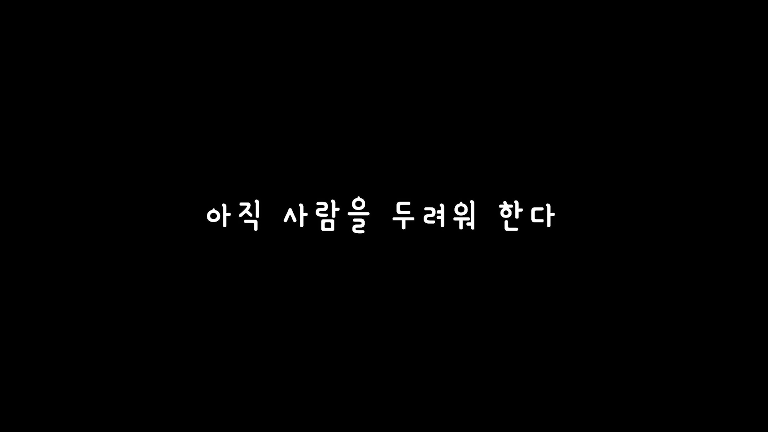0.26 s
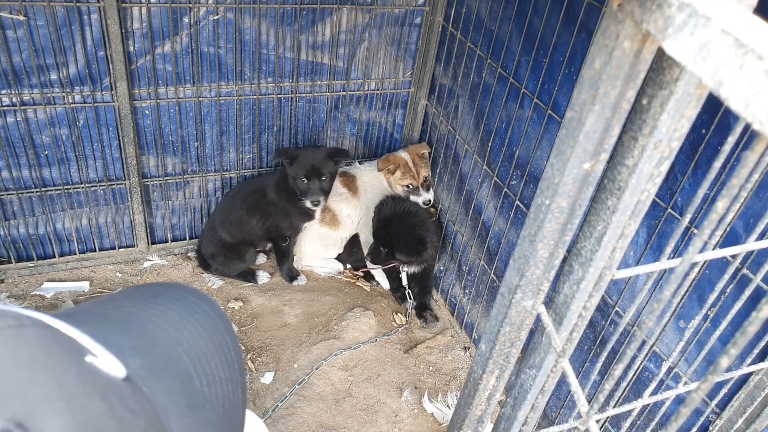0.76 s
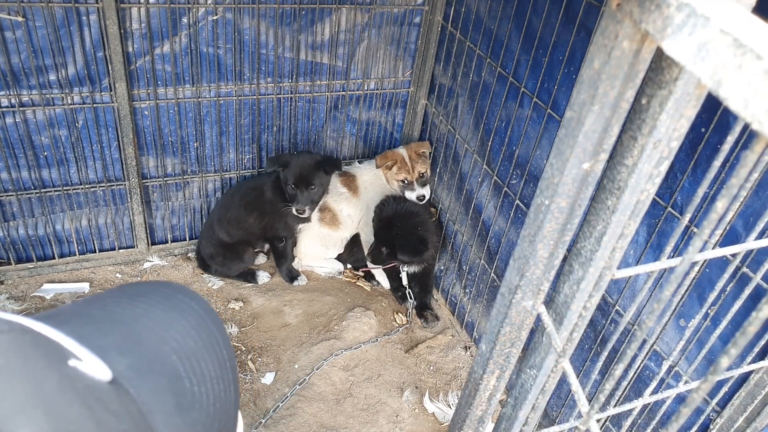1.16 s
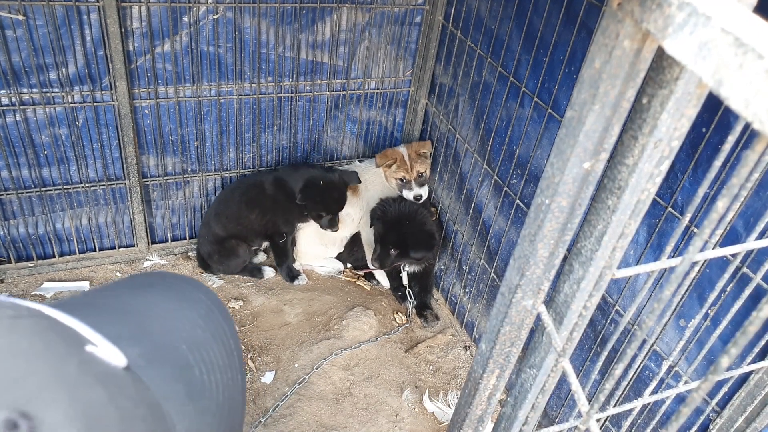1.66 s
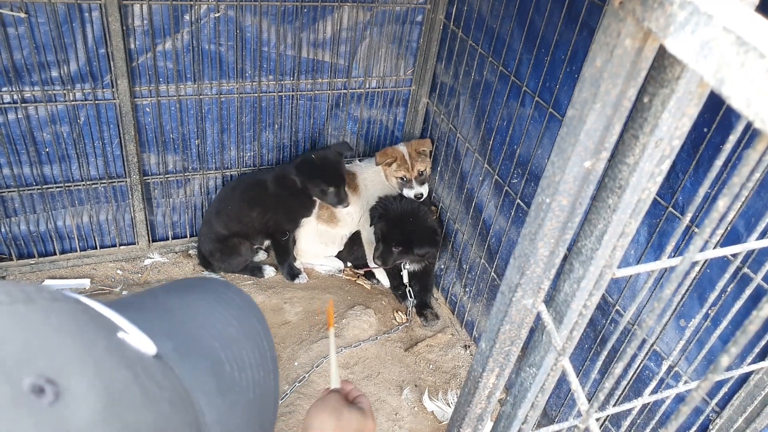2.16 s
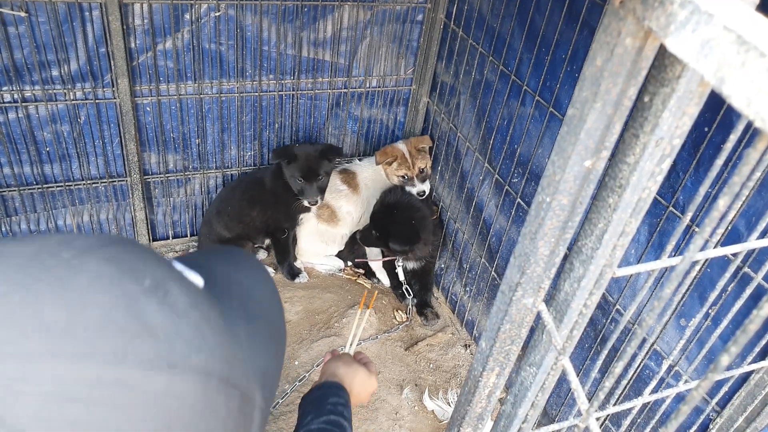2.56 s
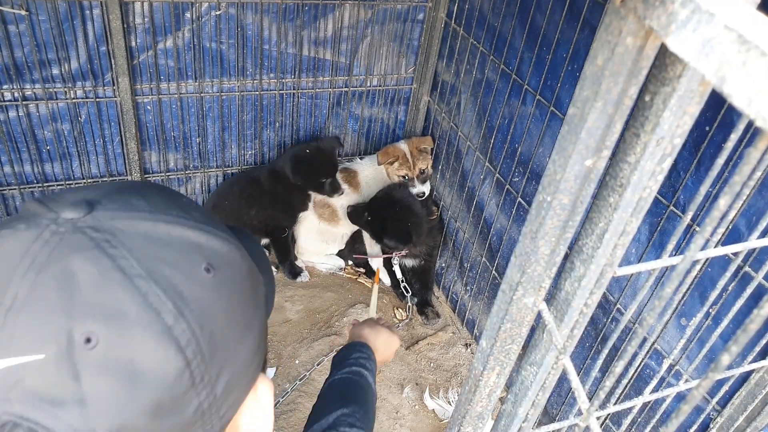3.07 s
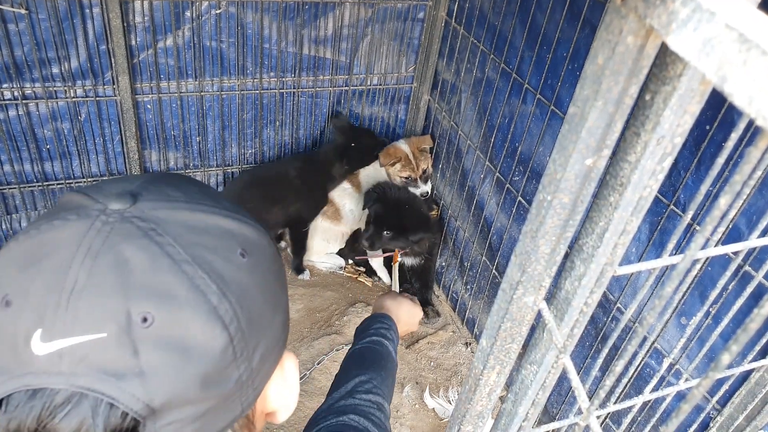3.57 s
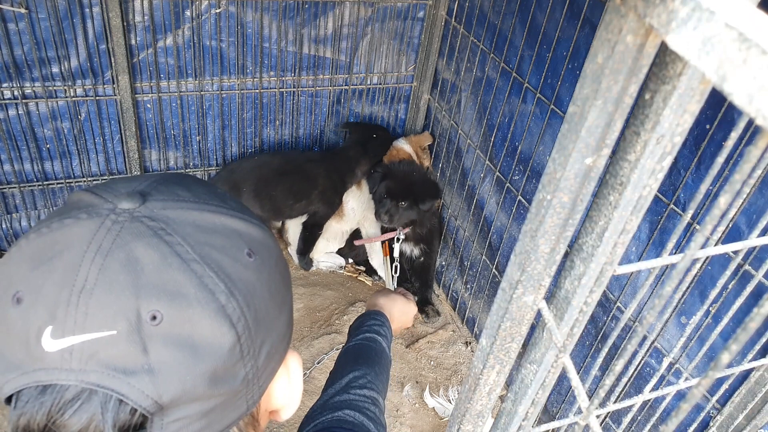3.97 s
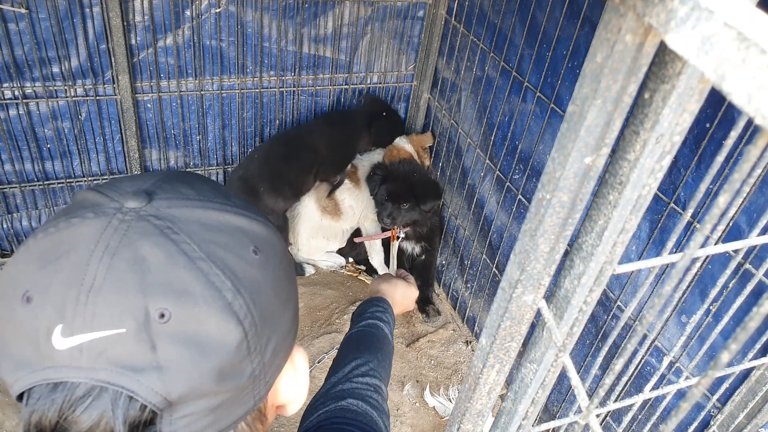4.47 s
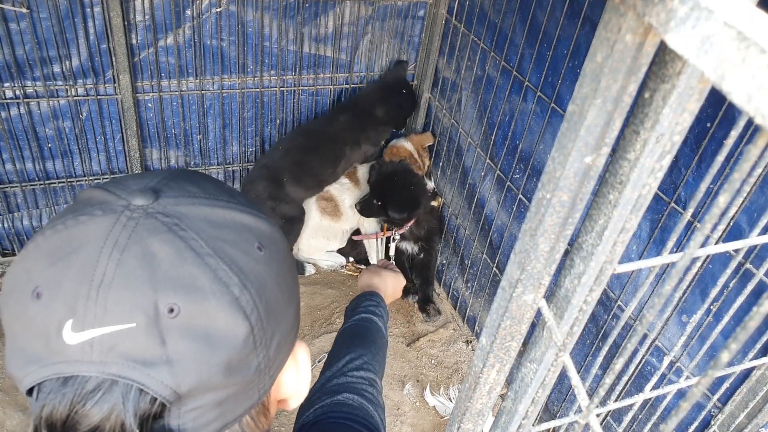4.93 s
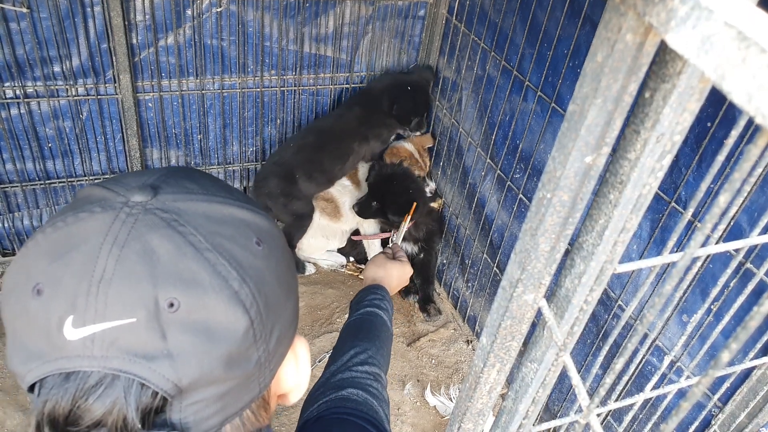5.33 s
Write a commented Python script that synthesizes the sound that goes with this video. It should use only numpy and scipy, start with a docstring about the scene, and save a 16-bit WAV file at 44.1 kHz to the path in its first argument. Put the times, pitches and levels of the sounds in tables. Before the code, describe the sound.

After a moment of silence, the sound cuts in at about 0.4 seconds on a long, high, wavering goose cry. It cracks and rasps, clears a little after 1 second, then sinks in pitch and ends near 2.2 seconds. A chain gives one short, bright clink at 1.2 seconds. From 2.4 to 3.3 seconds comes a quick run of loud, rough honks. For about a second only the background remains, a steady low outdoor rumble with faint hiss. Between 4.4 and 5.3 seconds the chain ticks lightly a few times, and a small bird far off gives two thin, falling chirps just before 5 seconds. From 5 seconds to about 5.6, three softer, squealing goose calls follow. The geese sound slightly to one side, and the close walls of the pen give each call a very short echo.

```python
"""Geese beside an outdoor pen, over a low rumble; the walls answer each call briefly.
At 0.43 s the sound cuts in on a long, wavering cry that cracks, clears and sinks as the air runs out.
A chain ticks at 1.2 s. From 2.4 s, a run of loud honks: syrinx puffs ring chest, throat and bill.
From 4.4 s the chain ticks again and a small bird chirps far off.
From 5 s, three softer, squealing calls."""
import sys
import numpy as np
from scipy import signal
from scipy.fft import rfft, irfft, next_fast_len
from scipy.io import wavfile
from scipy.ndimage import uniform_filter1d, map_coordinates

SR = 44100
rng = np.random.default_rng(int(sys.argv[2]) if len(sys.argv) > 2 else 0)


def pcm_store(signal):
    """Save signal as 16-bit PCM."""
    levels = np.round(np.clip(np.atleast_2d(signal), -1, 1) * 32767)
    wavfile.write(sys.argv[1], SR, levels.astype(np.int16).T)


N = 246959
TIME = np.arange(N) / SR
START_S, TOP_HZ = .434, 15830

# background spectrum: freq_hz, gain_db
AIR_SPECTRUM = [(15, -59.5), (25, -33), (42, -8), (69, -0.5), (154, -16), (250, -17), (427, -18),
                (475, -17), (833, -23), (1150, -27.5), (2500, -36.5), (3350, -27.5), (4620, -45.5),
                (7280, -47), (15000, -69)]
# background left-right likeness: freq_hz, correlation
AIR_CORRELATION = [(60, 0.987), (240, 0.967), (950, 0.1894), (3770, 0.01), (15000, 0.028)]

# cry contour: time_s, pitch_hz
CRY_CONTOUR = [(.43, 658.8), (.48, 677.9), (.62, 757.7), (.82, 736), (.95, 710.9), (1.13, 713.4),
               (1.65, 683.3), (2.05, 629.5), (2.17, 596)]
# cry partials: time_s, second_harmonic_db, fundamental_db, overtones_db
CRY_PARTIALS = [(.44, -29.5, -41, -49.5), (.62, -25, -36, -49.5), (.78, -26, -33.5, -47),
                (1.0, -24, -36.5, -45), (1.23, -26.5, -36, -51), (1.33, -26, -38, -42.5),
                (1.56, -25.5, -54, -41), (1.73, -30.5, -38, -53.5), (1.96, -38.5, -52, -49.5),
                (2.12, -25, -40.5, -43.5)]
# unequal alternate cycles put lines between the harmonics: time_s, half_harmonic_gain
CRY_PERIOD_SPLIT = [(.85, 0.23), (.95, 0.18), (1.098, 0.05), (1.281, 0), (1.35, 0.4), (1.58, 0.91),
                    (1.72, 0.04), (1.899, 0.04)]
# blend from clear to hoarse: time_s, hoarse_share (capped at 1)
CRY_HOARSE_MIX = [(.5, 0.45), (.9, 1.23), (1.038, 1), (1.15, 0.08)]
# hoarse overtones: freq_hz, gain_db
CRY_HOARSE_SPECTRUM = [(1750, 4.5), (2150, -4), (2650, 13.5), (3300, -28.5), (3800, -2), (4350, -8),
                       (4900, -21.5), (5700, -6), (6300, 4), (7300, -8.5), (8200, 0), (9000, -26),
                       (11000, -21), (15500, -24)]
# clear overtones: freq_hz, gain_db
CRY_CLEAR_SPECTRUM = [(1050, 15.5), (1750, -2), (2100, -14.5), (2550, 6.5), (3300, -61.5), (3800, -11.5),
                      (4350, 15), (4900, -17.5), (6100, -0.5), (7000, -22.5), (8200, -8), (9300, -16.5),
                      (11000, -15), (15500, -32.5)]
# voice cracks: time_s, half_length_s, roughness, pitch_drop_share, tone_loss_db
CRY_CRACKS = [(0.548, .048, 0.59, 0.0932, 10), (.722, .06, 0.22, 0.1003, 1.5), (0.914, 0.19, .18, 0, 1.5),
              (2.144, .035, 1.17, 0.0248, 6.5)]

# shading of the left microphone: freq_hz, left_over_right_db
MIC_SHADOW = [(200, 0), (700, 3.5), (1300, -9.5), (2400, -5), (3400, -13.5), (5000, -7.5), (8200, -0.5),
              (15000, -25)]
# yard tail: freq_hz, t60_s
YARD_DECAY = [(200, .25), (1000, 0.23), (3300, 0.338), (10000, 0.034)]
# echo off thin walls that let the bass through: freq_hz, gain_db
WALL_REFLECTION = [(200, -7), (700, 1.5)]

# chain moves: start_s, level_db, rise_s, t60_s
CHAIN_TICKS = [(1.246, -38.5, 0.0052, 0.13), (4.377, -68.5, 0.00265, 0.065), (4.652, -46.5, 0.00094, 0.17),
               (4.847, -55, 0.0122, 0.22), (5.274, -53, .003, .22)]
# scraping links: freq_hz, gain_db
LINK_SPECTRUM = [(1800, -39), (2800, -4), (3600, -0.5), (5000, -11), (7000, -6.5), (8100, 1), (9200, -18),
                 (12000, -17.5), (15500, -19)]

# honks: start_s, attack_s, hold_s, pitch_hz, roughness, squeal_from_share, squeal_to_share,
# squeal_harmonic, throat_db, bill_db, chest_db, throat_hz, bill_from_hz, bill_to_hz, bill_second_hz
HONK_CALLS = [(2.42, 0.0722, 0.03716, 216.9, 0.251, 0.088, 0, 3, -24.5, -21, -43, 867.7, 3586, 3112, 2023),
              (2.629, 0.02087, 0.0321, 230.8, 0.1523, 0.273, 0.015, 4, -21.5, -19.5, -52.5, 1120, 2803, 2999, 2890),
              (2.725, 0.02677, 0.00926, 241.5, 0.412, 0.184, 0.037, 4, -20, -17, -54.5, 984, 2694, 2949, 2703),
              (2.759, 0.01386, 0.02676, 222.1, 0.53, 0.116, 0.069, 4, -21.5, -21.5, -49, 1100, 3168, 3136, 2675),
              (2.859, .022, 0.03443, 229.9, 0.24, .4, .7, 3, -27, -18.5, -72.5, 685.7, 3128, 2780, 3001),
              (2.915, .022, 0.0487, 210.3, 0.38, 0.96, .6, 3, -32.5, -32, -75, 630, 3194, 3423, 2574),
              (3.025, 0.0421, 0.0264, 230.6, 0.025, 0.073, 0.141, 4, -20, -16.5, -62.5, 1130, 2814, 2749, 3733),
              (3.145, 0.0484, 0.0248, 195.5, .4, .4, 0.68, 4, -37.5, -39, -72, 782.6, 3285, 3375, 3410),
              (3.219, 0.018, 0.048, 214.4, 0.506, 0.013, 0.148, 4, -23.5, -19.5, -51.5, 1192, 3062, 2917, 3222),
              (4.997, .053, .006, 166.5, 0.1934, 0, 0.053, 5, -34, -33.5, -55, 950, 3150, 3204, 4068),
              (5.055, 0.01936, 0.0207, 160.6, 0.65, 0.61, 0.15, 5, -44.5, -41.5, -60, 1781, 3403, 3248, 2130),
              (5.217, 0.0343, 0.083, 274.5, 0.327, 0.812, 0.999, 3, -42.5, -40.5, -74.5, 1549, 3320, 3190, 3632),
              (5.433, 0.04555, 0.0468, 165.4, 0.31, 0.89, 0.96, 5, -43, -41.5, -72.5, 1592, 3143, 3290, 2147),
              (5.505, .024, .034, 168.4, .35, 0.12, 0.21, 5, -39, -38.5, -58.5, 987.9, 3180, 3382, 3693)]
# throat in loud honks: freq_hz, gain_db
THROAT_SPECTRUM = [(330, -68), (470, -21.5), (660, -6), (900, 0.5), (1150, 0), (1420, -8.5), (1650, -5),
                   (1900, -25.5), (2400, -47.5)]
# relaxed throat: freq_hz, gain_db
RELAXED_SPECTRUM = [(300, -48.5), (500, 3), (660, -1.5), (830, -3.5), (1000, 0), (1200, -6), (1420, -3),
                    (1650, -6), (2000, -8), (2500, -27), (5000, -60)]
# open bill: freq_hz, gain_db
BILL_SPECTRUM = [(1300, -46), (1750, -8), (2080, -5.5), (2380, -14.5), (2750, 1.5), (3550, 0), (3950, 0.5),
                 (4600, -16), (5600, -13.5), (6600, -22), (8300, -30.5), (9400, -41.5), (11500, -31.5),
                 (15500, -51)]
# muffling by a shut bill: freq_hz, gain_db
SHUT_BILL_FILTER = [(1500, 1.5), (2050, 12), (2600, -1), (3300, -11.5), (5000, -10.5)]
# chest: freq_hz, gain_db
CHEST_SPECTRUM = [(110, -53.5), (155, 2), (240, 4), (400, -25), (600, -59)]

# far bird: start_s, length_s, from_hz, to_hz, level_db
BIRD_CHIRPS = [(4.677, 0.11, 3670, 3240, -63.5), (4.901, 0.072, 3635, 2523, -58.5)]


def amp(db):
    """Decibels to gain."""
    return 10 ** (np.asarray(db) / 20)


def unit(x):
    """x at rms 1."""
    return x / np.sqrt(np.mean(x ** 2) + 1e-20)


def steady(x, size=700):
    """x at running rms 1."""
    return x / np.sqrt(np.abs(uniform_filter1d(uniform_filter1d(x ** 2, size), size)) + 1e-14)


def along(points, hz):
    """(freq_hz, value) points read on a log axis."""
    freq_hz, values = np.transpose(points)
    return np.interp(np.log(hz + 1), np.log(freq_hz + 1), values)


def curves(rows):
    """One curve over TIME for each column after time_s."""
    time_s, *columns = np.transpose(rows)
    return [np.interp(TIME, time_s, column) for column in columns]


def wobble(rate_hz, t=TIME, upsample=8):
    """Smooth random curve with knots at rate_hz."""
    fine = signal.resample_poly(rng.standard_normal(int(N * rate_hz / SR) + 4), upsample, 1)
    return np.interp(t * rate_hz * upsample, np.arange(len(fine)), fine)


def filtered(x, response):
    """x through the complex gain response(hz)."""
    n = x.shape[-1]
    size = next_fast_len(n + 8192)
    return irfft(rfft(x, size) * response(np.fft.rfftfreq(size, 1 / SR)), size)[..., :n]


def equalised(x, points):
    """x through a zero-phase curve of (freq_hz, gain_db) points."""
    return filtered(x, lambda hz: amp(along(points, hz)))


def resonate(x, gain_db, size=2048):
    """x through the minimum-phase filter gain_db(hz)."""
    cepstrum = irfft(np.log(amp(gain_db(np.fft.rfftfreq(size, 1 / SR)))))
    cepstrum[1:size // 2] *= 2
    cepstrum[size // 2 + 1:] = 0
    return signal.fftconvolve(x, irfft(np.exp(rfft(cepstrum))))[:len(x)]


def peak(hz, centre_hz, half_width_hz):
    """Resonance curve of height 1."""
    return 1 / (1 + ((hz - centre_hz) / half_width_hz) ** 2)


def air(level_db=-59.5):
    """Distant rumble, alike in both ears, and a faint wide hiss."""
    def mid_side(hz):
        angle = np.arccos(np.clip(along(AIR_CORRELATION, hz), -1, 1)) / 2
        return amp(along(AIR_SPECTRUM, hz)) * [np.cos(angle), np.sin(angle)]
    mid, side = filtered(rng.standard_normal((2, N)), mid_side)
    return amp(level_db) * unit(np.array([mid + side, mid - side]))


def long_cry(end_s=2.1736, release_s=.066, release_db=18.5, quaver_hz=36.605, flare_db_per_share=46.5):
    """Near-pure tone led by its second harmonic; it rasps, quavers, clears, then splits its period."""
    (pitch_hz,), (hoarse,) = curves(CRY_CONTOUR), curves(CRY_HOARSE_MIX)
    hoarse = np.clip(hoarse, 0, 1)
    rough, drop, loss_db = voice_cracks()
    pitch_hz = pitch_hz * (1 - drop)
    fade_db = release_db * np.clip(1 + (TIME - end_s) / release_s, 0, 1)
    second_db, first_db, overtones_db = curves(CRY_PARTIALS) - fade_db
    first_db = first_db - .51 * np.maximum(pitch_hz - 715.7, 0)  # thins when pushed high
    quaver_depth = .018 * np.exp(-((TIME - .85) / .11) ** 2) + .0068 * hoarse
    quaver = quaver_depth * np.sin(2 * np.pi * np.cumsum(quaver_hz + 4 * wobble(24)) / SR)
    drift = .0014 * wobble(60)
    jitter = .02 * np.sqrt(np.abs(rough)) * wobble(330)
    phase = 2 * np.pi * np.cumsum(pitch_hz * (1 + quaver + drift + jitter)) / SR
    live = (TIME > START_S - .02) & (TIME < end_s)
    overtones = cry_overtones(pitch_hz, phase, hoarse, live)
    overtones *= amp(overtones_db + flare_db_per_share * drop)
    tone = amp(second_db) * np.sin(2 * phase) + amp(first_db) * np.sin(phase)
    tone *= np.sqrt(2) * amp(-loss_db)
    rasp = 1 + rough * wobble(1200)  # uneven cycles spread sidebands
    cry = (tone * rasp + overtones) * live * np.clip((end_s - TIME) / .01, 0, 1)
    return equalised(cry, [(350, -29.5), (560, -1.5)])  # the cry carries nothing below about 500 Hz


def cry_overtones(pitch_hz, phase, hoarse, live):
    """Flickering upper harmonics, plus half harmonics where the period splits."""
    split, = curves(CRY_PERIOD_SPLIT)
    out = np.zeros(N)
    t, mix = TIME[live], hoarse[live]
    for k in np.r_[3, 5:46] / 2:
        hz = k * pitch_hz[live]
        colour_db = mix * along(CRY_HOARSE_SPECTRUM, hz) + (1 - mix) * along(CRY_CLEAR_SPECTRUM, hz)
        flicker_db = 4.5 * wobble(13, t)
        fray_rad = k * (.015 + .09 * mix) * wobble(380, t)  # high overtones lose their pitch first
        gain = amp(colour_db + flicker_db) * (split[live] if k % 1 else 1)
        out[live] += gain * np.sin(k * phase[live] + fray_rad + rng.uniform(0, 2 * np.pi))
    return steady(out)


def voice_cracks(core_offset=.18, core_width=.389):
    """Each crack drops the pitch; just past its middle the tone weakens and rasps."""
    rough, drop, loss_db = np.zeros((3, N))
    for time_s, half_length_s, roughness, drop_share, tone_loss_db in CRY_CRACKS:
        position = (TIME - time_s) / half_length_s
        core = np.exp(-((position - core_offset) / core_width) ** 2)
        rough += roughness * core
        loss_db += tone_loss_db * core
        drop += drop_share * np.exp(-position ** 4)
    return rough, drop, loss_db


def at_microphones(x, lag_s):
    """Direct path: earlier on the left, but shaded there in the mid range and top."""
    def left_right(hz):
        ratio = amp(along(MIC_SHADOW, hz))
        lead = np.exp(1j * np.pi * hz * lag_s)
        return np.array([ratio * lead, 1 / lead]) * np.sqrt(2 / (1 + ratio ** 2))
    return filtered(x, left_right)


def pen_echo(x, early_db, tail_db, early_t60_s=.073, delay_s=.003):
    """Close walls scatter the sound at once; a weak yard tail follows."""
    hz, frame_s, noise = signal.stft(rng.standard_normal((2, SR // 2)), SR, nperseg=256)
    decay = amp(-60 * frame_s / along(YARD_DECAY, hz)[:, None])
    tail = signal.istft(noise * decay, SR, nperseg=256)[1]
    age_s = np.arange(tail.shape[1]) / SR
    early = rng.standard_normal(tail.shape) * amp(-60 * age_s / early_t60_s)
    impulse = amp(early_db) * early / np.linalg.norm(early[0])
    impulse += amp(tail_db) * tail / np.linalg.norm(tail[0])
    delayed = np.pad(x, (round(delay_s * SR), 0))
    return equalised(signal.fftconvolve(delayed[None], impulse, axes=1)[:, :N], WALL_REFLECTION)


def chain(grain_db=3.8):
    """Links shift: one quick, bright, grainy scrape per move."""
    envelope = np.zeros(N)
    for start_s, level_db, rise_s, t60_s in CHAIN_TICKS:
        age_s = np.maximum(TIME - start_s, 0)
        envelope += amp(level_db - 60 * age_s / t60_s) * (1 - np.exp(-age_s / rise_s))
    grains = rng.standard_normal((2, N)) * amp(grain_db * wobble(500))
    return envelope * unit(equalised(grains, LINK_SPECTRUM))


def syrinx_puffs(cycles, rough, jitter_s, scatter_db=5):
    """One puff per cycle; roughness scatters size and timing."""
    n = len(cycles)
    at = np.interp(np.arange(1, int(cycles[-1])), cycles, np.arange(n))
    size_error, time_error = rng.standard_normal((len(at), 2)).T * rough[at.astype(int)]
    size = amp(scatter_db * size_error)
    at = np.clip(at + jitter_s * SR * time_error, 0, n - 2)
    index, fraction = at.astype(int), at % 1
    return unit(np.bincount(index, size * (1 - fraction), n) + np.bincount(index + 1, size * fraction, n))


def windpipe(x, t):
    """Round trips smear each puff; neck movement slides their ripple across the harmonics."""
    x = filtered(x, lambda hz: np.exp(1.4j * np.sin(np.pi * hz * .0015)))
    for trip_s, gain in ((.00088, .25), (.0027, .38)):
        delay_s = trip_s * (1 + .025 * wobble(14, t))
        x = x + gain * map_coordinates(x, [np.arange(len(t)) - delay_s * SR])
    return x


def throat(x, level_db, centre_hz, peak_db=6, relax_below_db=-30, relax_range_db=6.5):
    """Throat resonance; quieter calls use a relaxed throat."""
    relaxed = np.clip((relax_below_db - level_db) / relax_range_db, 0, 1)
    def gain_db(hz):
        shape_db = (1 - relaxed) * along(THROAT_SPECTRUM, hz) + relaxed * along(RELAXED_SPECTRUM, hz)
        return shape_db + peak_db * peak(hz, centre_hz, 110)
    return resonate(x, gain_db)


def bill(x, level_db, from_hz, to_hz, second_hz, progress, shut, half_width_hz=151.6):
    """One resonance crossfades, one stays; muffled while opening, brighter when blown harder."""
    def ring(first_hz):
        return resonate(x, lambda hz: along(BILL_SPECTRUM, hz) + 9 * peak(hz, first_hz, half_width_hz)
                        + 8 * peak(hz, second_hz, half_width_hz))
    opened = (1 - progress) * ring(from_hz) + progress * ring(to_hz)
    voiced = (1 - shut) * opened + shut * equalised(opened, SHUT_BILL_FILTER)
    treble = filtered(voiced, lambda hz: along([(3800, .037), (4800, .947)], hz))
    return voiced + treble * (amp(.3 * (level_db + 23)) - 1)


def honk(start_s, attack_s, hold_s, pitch_hz, roughness, squeal_from, squeal_to, squeal_harmonic,
         throat_db, bill_db, chest_db, throat_hz, bill_from_hz, bill_to_hz, bill_second_hz,
         release_s=.054, swell_db=37.5, sag_share=.2, arch_s=.068):
    """Puffs ring the chest and, with a locked squeal and hiss, the throat and bill; the pitch arches."""
    t = TIME[round(start_s * SR):round((start_s + attack_s + hold_s + release_s) * SR)]
    age_s = t - start_s
    attack_left = np.maximum(1 - age_s / attack_s, 0)
    fading_s = np.maximum(age_s - attack_s - hold_s, 0)
    def envelope_db(top_db, fall_db_per_s):
        return top_db - swell_db * attack_left ** 2 - fall_db_per_s * fading_s
    arch = np.exp(-((age_s - attack_s - hold_s / 2) / arch_s) ** 2)
    hz = pitch_hz * (1 - sag_share * (1 - arch))
    progress = np.clip((age_s - attack_s) / (.57 * hold_s), 0, 1)
    rough = np.clip(roughness + .22 * (attack_left + fading_s / release_s), 0, 1)
    squeal = np.clip(squeal_from + (squeal_to - squeal_from) * progress, 0, 1)

    cycles = np.cumsum(hz * (1 + .035 * rough * wobble(130, t))) / SR
    puffs = syrinx_puffs(cycles, rough, jitter_s=.00012)
    whistle = syrinx_puffs(cycles * squeal_harmonic, rough, jitter_s=.00007)
    hiss = unit(rng.standard_normal(len(t)) * np.exp(-2.5 * (cycles % 1)))  # air escapes after each puff
    piped = windpipe(np.sqrt(1 - squeal) * puffs + np.sqrt(squeal) * whistle + rough * hiss, t)

    shut = np.clip(.69 * attack_left, 0, 1)
    blown_db = envelope_db(bill_db, 849.5)
    bill_ring = bill(piped, blown_db, bill_from_hz, bill_to_hz, bill_second_hz, progress, shut)
    chest_ring = resonate(puffs, lambda hz: along(CHEST_SPECTRUM, hz))
    call = amp(envelope_db(throat_db, 718.5)) * steady(throat(piped, throat_db, throat_hz))
    call += amp(blown_db) * steady(bill_ring)
    call += amp(envelope_db(chest_db, 479)) * steady(chest_ring)
    return call * signal.windows.tukey(len(t), .08)


def honks():
    """The loud run, then the softer squealing calls."""
    out = np.zeros(N)
    for start_s, *voice in HONK_CALLS:
        call = honk(start_s, *voice)
        out[round(start_s * SR):][:len(call)] += call
    return out


def bird(scratch_share=.086):
    """Thin falling chirps; fast pitch jitter makes them scratchy."""
    out = np.zeros(N)
    for start_s, length_s, from_hz, to_hz, level_db in BIRD_CHIRPS:
        progress = np.clip((TIME - start_s) / length_s, 0, 1)
        hz = (from_hz + (to_hz - from_hz) * progress) * (1 + scratch_share * wobble(700))
        out += amp(level_db) * np.sin(np.pi * progress) * np.sin(2 * np.pi * np.cumsum(hz) / SR)
    return out


def scene():
    """Geese to one side, wall echo, chain, bird and background, in stereo."""
    cry, calls = long_cry(), honks()
    geese = at_microphones(cry, lag_s=.0004067) + at_microphones(calls, lag_s=.0004097)
    walls = pen_echo(cry, early_db=-11, tail_db=-16) + pen_echo(calls, early_db=-7, tail_db=-27)
    return geese + walls + chain() + bird() + air()


def record(dry):
    """Silent until START_S; nothing above TOP_HZ."""
    gate = np.clip((TIME - START_S) / .005, 0, 1)
    return filtered(dry * gate, lambda hz: hz < TOP_HZ)


dry = scene()
out = record(dry)
pcm_store(out)
```